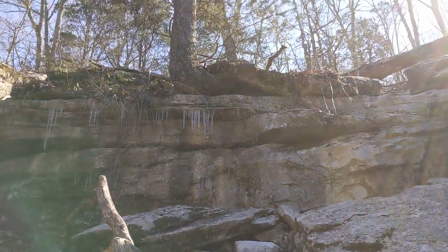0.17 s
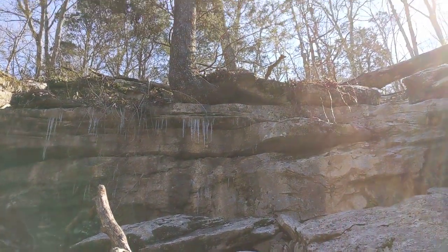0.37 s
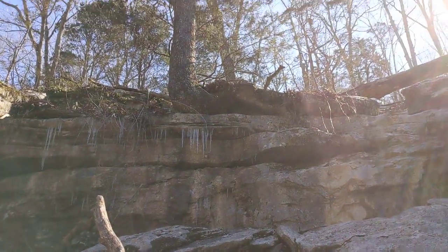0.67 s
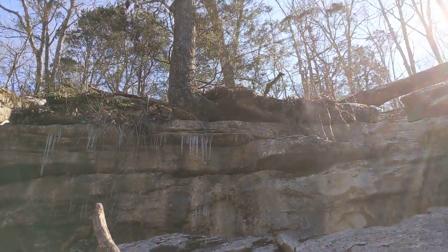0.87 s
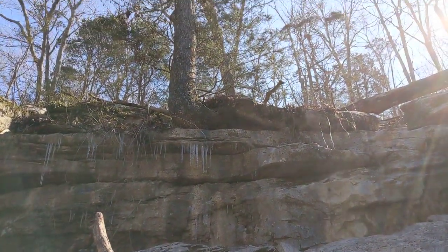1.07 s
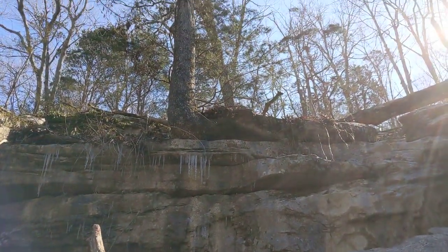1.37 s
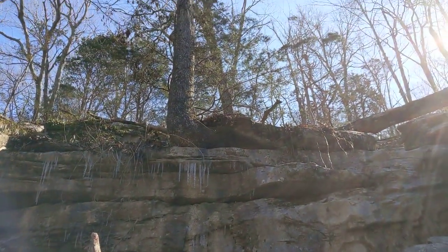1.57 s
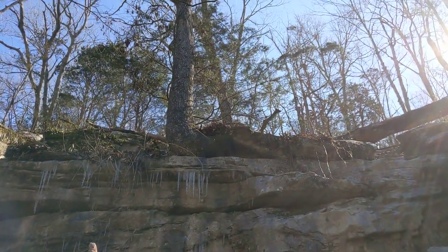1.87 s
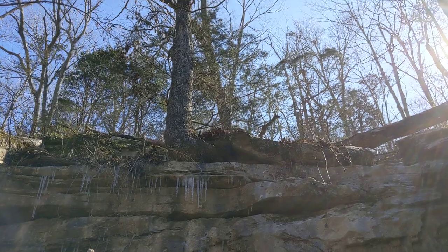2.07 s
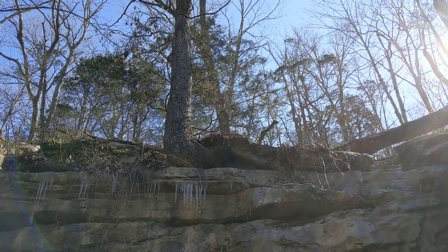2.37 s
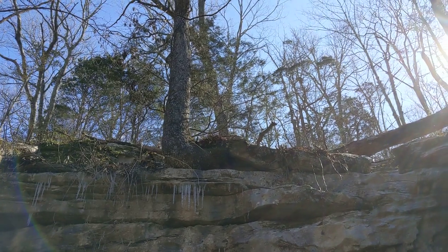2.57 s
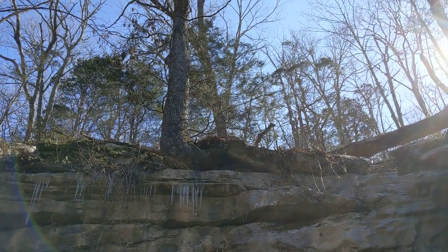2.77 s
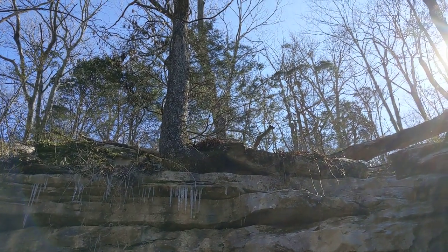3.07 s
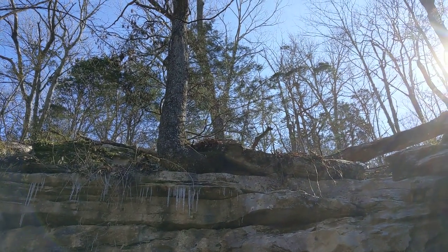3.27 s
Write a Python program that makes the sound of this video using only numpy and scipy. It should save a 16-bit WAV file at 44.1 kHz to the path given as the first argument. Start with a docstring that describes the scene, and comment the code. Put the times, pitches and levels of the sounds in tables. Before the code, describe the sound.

Water drips from melting icicles, ticking on stone and plinking into shallow water in light wind.

```python
"""Icicles melt on a rock ledge outdoors. From the start, drops burst on the stone just to the right in
fine, bright ticks, while light wind buffets the microphone over a far rumble and a soft hiss. Now and
then a drop plinks into shallow water, where a bubble rings, and three dull splats fall farther off;
the rock face throws back short echoes. The wind dies away by 1.7 s, the loudest plinks follow, and
the ticking goes on to the end."""
import sys
import numpy as np
from scipy import signal
from scipy.fft import rfft, irfft, next_fast_len
from scipy.io import wavfile

SR = 44100
rng = np.random.default_rng(int(sys.argv[2]) if len(sys.argv) > 2 else 0)


def waveform_to_disk(signal):
    """Save audio, clipped to [-1, 1], as 16-bit WAV at the path in sys.argv[1]."""
    frames = np.transpose(np.atleast_2d(signal))
    scaled = np.clip(frames, -1, 1) * 32767
    samples = np.round(scaled).astype(np.int16)
    wavfile.write(sys.argv[1], SR, samples)


N = 150381

# drops bursting on wet stone: t/s, relative level/dB, centre f/Hz
STONE_DROPS = [(.147, -39.5, 10900), (0.231, -31.5, 14300), (0.3053, -34.5, 12400), (0.459, -37, 11700),
               (0.5567, -39, 13800), (0.7448, -32, 12700), (0.772, -35.5, 11900), (0.7952, -38.5, 11500),
               (0.8082, -37, 13000), (0.8563, -33, 12600), (0.9866, -36, 12200), (1.0854, -39, 13000),
               (1.1679, -34.5, 14900), (1.2447, -38.5, 11700), (1.3306, -36, 10500), (1.455, -37.5, 12700),
               (1.5397, -39, 13500), (1.5815, -37.5, 11300), (1.864, -36, 10700), (1.9086, -34.5, 10600),
               (1.9489, -38, 13900), (2.0272, -34, 12100), (2.101, -36, 12400), (2.1948, -36, 11100),
               (2.2837, -39.5, 13900), (2.3038, -33.5, 12100), (2.34, -36.5, 12900), (2.4, -33, 10800),
               (2.4973, -37.5, 9800), (2.6632, -38, 12900), (2.6718, -36, 12200), (2.726, -33.5, 13500),
               (2.7378, -33, 13900), (2.7792, -35, 12700), (2.8547, -35, 11200), (2.9662, -34.5, 10900),
               (3.0146, -38, 12300), (3.0725, -36.5, 10300), (3.164, -33.5, 14300), (3.2745, -37, 12500)]
# spectral envelope of a splash: f/Hz, level/dB
SPLASH_SPECTRUM = [(800, -22.5), (3000, -25.5), (6500, -14.5), (8300, -6), (10300, -3), (13000, -5),
                   (15500, -4), (16500, -26)]
# gain for splashes at the shaded left microphone: f/Hz, level/dB
LEFT_SHADE = [(3000, 15.5), (7000, 5.5), (10000, -12), (15000, -30)]
# drops falling into shallow water: t/s, relative level/dB, bubble f/Hz, bubble T60/s
WATER_DROPS = [(.012, -53, 2700, .06), (0.5797, -42, 4550, .011), (.8016, -52, 3910, .025),
               (0.9017, -49, 5860, .025), (0.9273, -46, 4910, .02), (0.9868, -41, 4620, .015),
               (1.006, -50, 5700, .015), (1.2469, -47, 5860, .022), (1.419, -48.5, 2330, .055),
               (1.7825, -47, 5200, .025), (1.8644, -29, 4350, .029), (2.0829, -45.5, 5110, .017),
               (2.1018, -38.5, 4620, .011), (2.1565, -51, 3950, .035), (2.1941, -39, 3570, .03),
               (2.2339, -35, 4820, .017), (2.377, -51, 3840, .028), (2.4005, -50, 4870, .014),
               (2.5627, -45, 5170, .025), (2.58, -49.5, 3770, .032), (2.9083, -49, 3950, .03),
               (3.0149, -32.5, 4300, .02), (3.0564, -49, 6120, .035), (3.3145, -46, 5400, .02)]
# duller drops farther off: t/s, relative level/dB, centre f/Hz, width/octaves
FAR_DROPS = [(.661, -50, 2150, .65), (1.4192, -53, 3000, .6), (1.763, -52, 940, .3)]
# gusts on the microphone, before panning: t/s, level/dB
GUSTS = [(0, -38), (.13, -46), (0.189, -29.5), (.27, -46.5), (.45, -28.5), (.63, -43.5), (0.691, -26),
         (.74, -41.5), (1.29, -29.5), (1.4, -50), (1.6, -31), (1.68, -62)]
# spectra of the wind, the rumble and the hiss: f/Hz, relative level/dB
WIND_SPECTRUM = [(12, -18), (25, -1), (42, 2), (72, -8.5), (110, -20.5), (400, -71)]
RUMBLE_SPECTRUM = [(20, -4), (45, -1), (75, 0), (122, -3.5), (165, -11.5), (280, -16), (420, -21.5),
                   (620, -18.5), (850, -23.5), (1200, -35), (2500, -38), (6000, -47)]
HISS_SPECTRUM = [(300, -38), (1000, 6), (2200, 0.5), (4500, 2), (7000, -2), (11000, 2.5), (16000, -2.5)]
# left-right likeness of the rumble: f/Hz, coherence/1
RUMBLE_COHERENCE = [(50, 0.93), (140, 0.97), (380, 0.8), (700, 0.39), (1200, 0.084)]

TICK_GAIN_DB, PLINK_GAIN_DB, SPLAT_GAIN_DB = 27, 26.7, 27.5
CRACK_T60_S, SPRAY_T60_S, SPRAY_DB = .0025, .025, 3.5
PLAIN_RING_T60_S, LEDGE_T60_S = .02, .07


def drips_on_stone():
    """Acoustic shadow: ticks and fine spatter on the right lose their top treble at the left."""
    track = np.zeros((2, N))
    for t, db, hz in STONE_DROPS:
        tick = splash(hz, width_hz=2100, spray_db=rng.normal(SPRAY_DB, 1))
        add(track, t, amp(db + TICK_GAIN_DB) * ledge_echo(tick, wet_db=-10))
    for t, size, pitch in random_drops(per_s=205):
        db = min(-24 + 4 * size, -17)
        hz = max(13180 + 1850 * pitch, 10500)
        add(track, t, amp(db) * splash(hz, width_hz=920, spray_db=SPRAY_DB))
    left, right = track
    return np.array([filtered(left, lambda hz: amp(along(LEFT_SHADE, hz))), right])


def splash(centre_hz, width_hz, spray_db):
    """Impact noise: a drop bursts on stone with a sharp crack and a slower-fading spray."""
    crack, spray = rng.standard_normal((2, 2, len(clock())))
    burst = unit_energy(crack * decay(CRACK_T60_S)) + amp(spray_db) * unit_energy(spray * decay(SPRAY_T60_S))
    peak = lambda hz: np.hypot(1, (hz - centre_hz) / width_hz) ** -1.5
    return unit_energy(coloured(burst, lambda hz: amp(along(SPLASH_SPECTRUM, hz)) * peak(hz)))


def drips_in_water():
    """Superposition: near plinks add to faint ones falling at random along the ledge."""
    track = np.zeros((2, N))
    for t, db, hz, ring_t60 in WATER_DROPS:
        add(track, t, amp(db + PLINK_GAIN_DB) * plink(hz, ring_t60))
    for t, size, pitch in random_drops(per_s=14):
        hz = 4400 * 2 ** (.35 * pitch)
        add(track, t, amp(-34 + 2 * size) * plink(hz, PLAIN_RING_T60_S))
    return track


def plink(bubble_hz, ring_t60):
    """Bubble resonance: a damped sine rings with the click of impact and a slap on the surface."""
    bubble = np.sin(2 * np.pi * bubble_hz * clock()) * decay(ring_t60)
    impact = amp(-14) * slap(bubble_hz, octaves=2.8, t60=CRACK_T60_S)
    surface = amp(1.5) * slap(1.03 * bubble_hz, octaves=.26, t60=.022)
    ring = ring_t60 / PLAIN_RING_T60_S * stone_echoes(bubble)  # a longer ring stands out more
    return unit_energy(ledge_echo(ring + impact + surface, wet_db=-10))


def slap(centre_hz, octaves, t60):
    """Resonance: a short noise burst, shaped around one peak, sounds as a wet slap."""
    burst = rng.standard_normal((2, len(clock()))) * decay(t60)
    peak = lambda hz: np.hypot(1, np.log2((hz + 1) / centre_hz) / octaves) ** -2
    return unit_energy(coloured(burst, peak))


def far_splats():
    """Direct-to-reverberant ratio: dull drops farther along the ledge carry more echo."""
    track = np.zeros((2, N))
    for t, db, hz, octaves in FAR_DROPS:
        add(track, t, amp(db + SPLAT_GAIN_DB) * ledge_echo(slap(hz, octaves, t60=.053), wet_db=2))
    return track


def stone_echoes(ring, count=6, longest_s=.0075):
    """Early reflection: the nearest stones send weak delayed copies, different in each channel."""
    pair = np.array([ring, ring])
    for channel in pair:
        delays = rng.uniform(0.096, 1, count) * longest_s
        for delay, sign in zip(delays, rng.choice([-1, 1], count)):
            lag = max(int(delay * SR), 1)
            channel[lag:] += amp(-9.5) * sign / np.sqrt(count) * ring[:-lag]
    return unit_energy(pair)


def ledge_echo(sound, wet_db):
    """Diffuse scattering: the rough rock face gives a drop a short tail of its own."""
    tail = unit_energy(rng.standard_normal(sound.shape) * decay(LEDGE_T60_S))
    return sound + amp(wet_db) * signal.fftconvolve(sound, tail, axes=1)[:, :sound.shape[1]]


def wind():
    """Amplitude modulation: gusts on the microphone swell a low noise, stronger on the right."""
    gusts = amp(np.interp(np.arange(N) / SR, *np.transpose(GUSTS)))
    return gusts * pan(-4.5) * stereo_noise(WIND_SPECTRUM, coherence=[(50, 0.13)])


def far_rumble(lag_s=.00025):
    """Arrival-time difference: a far rumble reaches the right channel first."""
    rumble = amp(-40) * pan(0.6) * stereo_noise(RUMBLE_SPECTRUM, RUMBLE_COHERENCE)
    delays = np.array([[lag_s], [-lag_s]]) / 2
    return filtered(rumble, lambda hz: np.exp(-2j * np.pi * hz * delays))


def hiss():
    """Incoherence: nearly independent channels make a soft hiss sound wide."""
    return amp(-53.5) * stereo_noise(HISS_SPECTRUM, coherence=[(2000, 0.029)])


def stereo_noise(spectrum, coherence):
    """Partial coherence: mid and side noise mix to a set left-right likeness, at rms 1."""
    def response(hz):
        angle = np.arccos(np.clip(along(coherence, hz), -1, 1)) / 2
        return amp(along(spectrum, hz)) * np.array([np.cos(angle), np.sin(angle)])
    mid, side = filtered(rng.standard_normal((2, N)), response)
    pair = np.array([mid + side, mid - side])
    return pair / np.sqrt(np.mean(pair ** 2) + 1e-20)


def random_drops(per_s):
    """Poisson process: rows of t/s, size, pitch; the last two are standard normal deviates."""
    deviates = rng.standard_normal((2000, 2))
    times = np.cumsum(rng.exponential(1, len(deviates))) / per_s
    return np.column_stack([times, deviates])[times < N / SR]


def coloured(burst, gain):
    """Minimum phase: folding the cepstrum gives a causal filter with the given gain curve."""
    n = burst.shape[-1]
    cepstrum = irfft(np.log(np.maximum(gain(np.fft.rfftfreq(n, 1 / SR)), 1e-6)))
    cepstrum[1:n // 2] *= 2
    cepstrum[n // 2 + 1:] = 0
    return irfft(rfft(burst) * np.exp(rfft(cepstrum)))


def filtered(x, response):
    """Linear filtering: the spectrum is multiplied by a frequency response."""
    size = next_fast_len(N + SR // 2)
    return irfft(rfft(x, size) * response(np.fft.rfftfreq(size, 1 / SR)), size)[..., :N]


def along(points, hz):
    """Interpolation of (f/Hz, value) points on a log frequency axis."""
    freqs, values = np.transpose(points)
    return np.interp(np.log(hz + 1), np.log(freqs + 1), values)


def amp(db):
    """Decibel law: level to amplitude ratio."""
    return 10 ** (np.asarray(db) / 20)


def pan(db):
    """Level difference: the left channel gains db and the right loses it."""
    return amp([[db], [-db]])


def unit_energy(x):
    """Normalisation of each channel to energy 1."""
    return x / np.sqrt(np.sum(x ** 2, axis=-1, keepdims=True) + 1e-20)


def clock():
    """Time t/s since a drop landed."""
    return np.arange(4096) / SR


def decay(t60):
    """Exponential damping: a fall of 60 dB in t60 seconds."""
    return np.exp(-np.log(1000) * clock() / max(t60, 1e-4))


def add(track, t, sound):
    """Superposition of a stereo sound on the track at t/s."""
    start = int(np.clip(round(t * SR), 0, N - 1))
    track[:, start:start + sound.shape[1]] += sound[:, :N - start]


def scene():
    """Superposition: the background and all the drips add in the open air."""
    return wind() + far_rumble() + hiss() + drips_in_water() + far_splats() + drips_on_stone()


def record(dry):
    """Band limiting: an ideal low-pass filter removes the highest treble."""
    return filtered(dry, lambda hz: hz < 15950)


dry = scene()
out = record(dry)
waveform_to_disk(out)
```